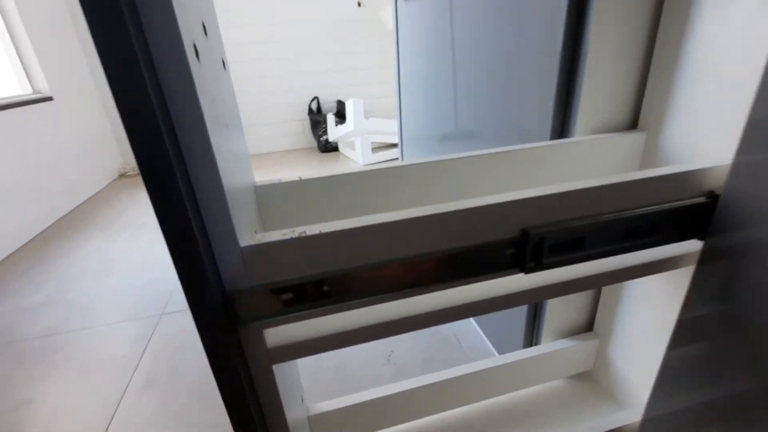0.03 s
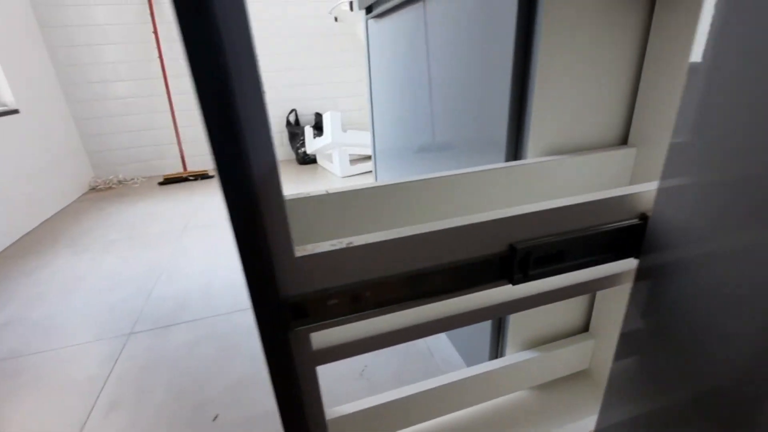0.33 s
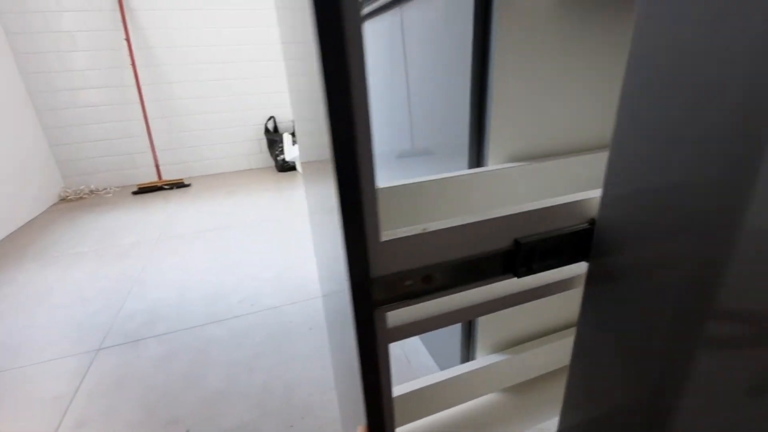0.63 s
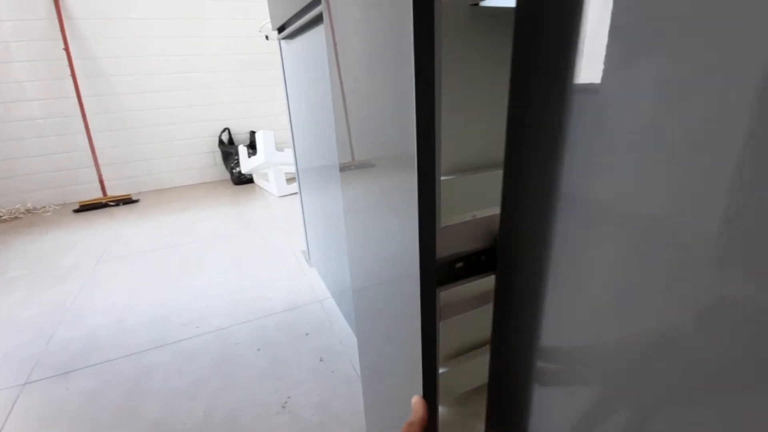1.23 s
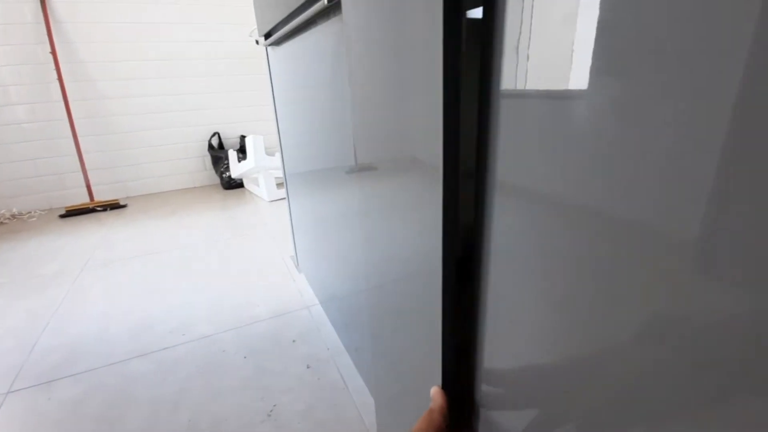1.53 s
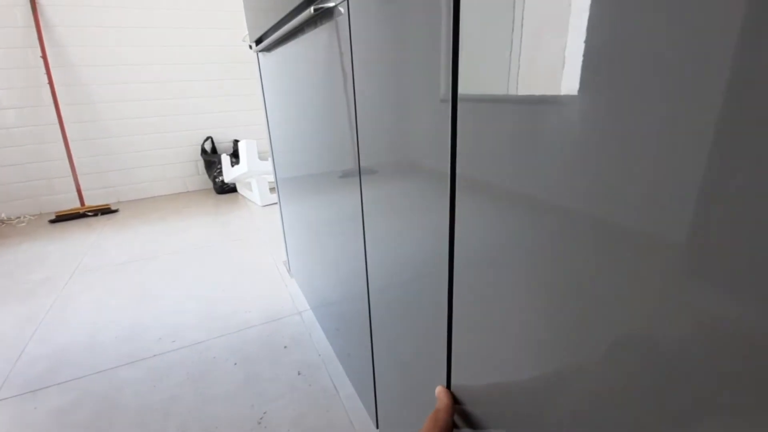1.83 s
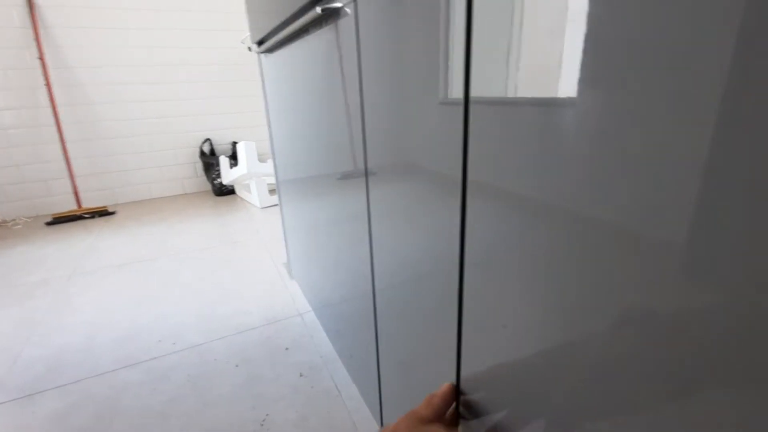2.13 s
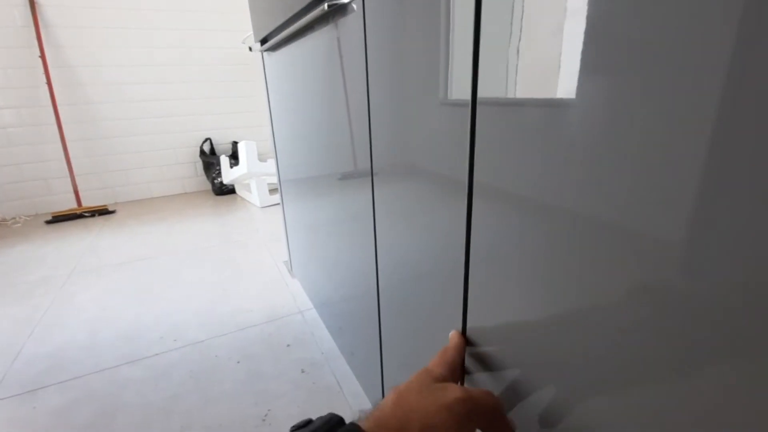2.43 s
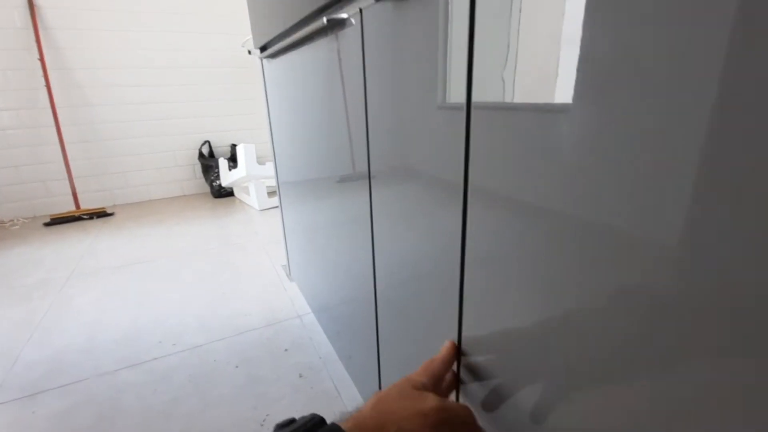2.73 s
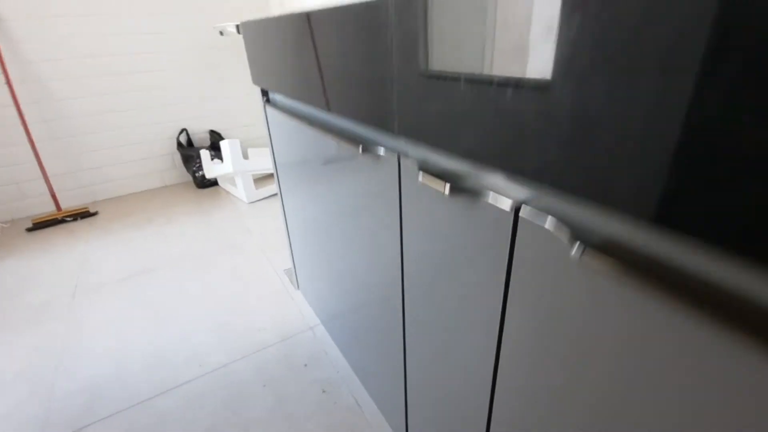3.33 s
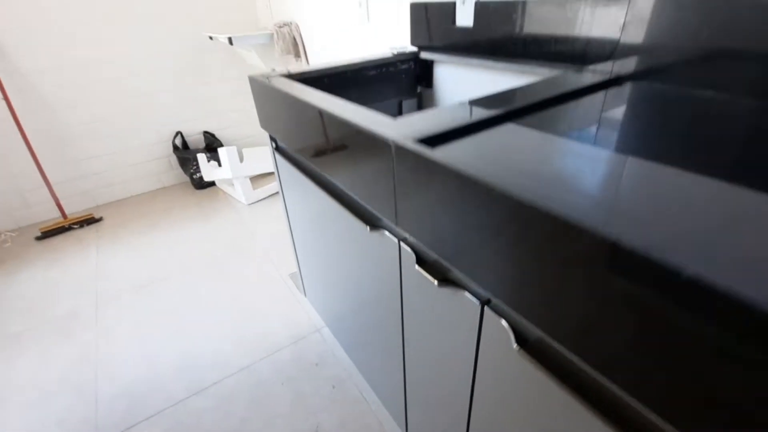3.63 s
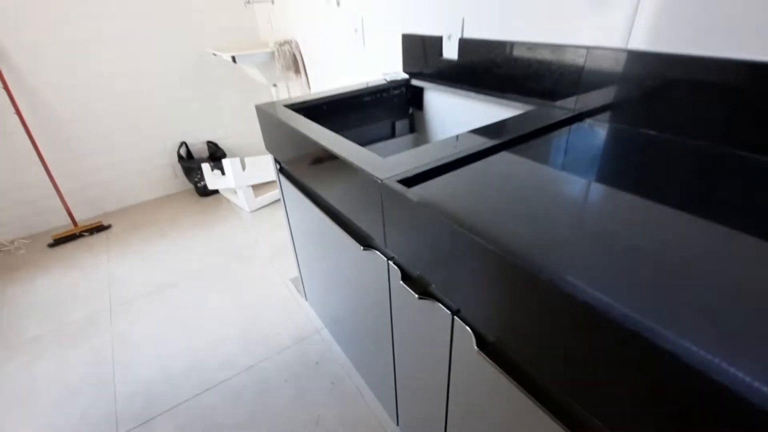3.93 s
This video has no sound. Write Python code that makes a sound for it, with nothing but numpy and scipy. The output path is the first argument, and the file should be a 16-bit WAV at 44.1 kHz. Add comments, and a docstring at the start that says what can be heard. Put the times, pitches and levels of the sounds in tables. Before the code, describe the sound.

A drawer rolls shut with soft knocks, followed by a sharp click in a bare room.

```python
"""Drawer closing in a bare room

A cabinet drawer is pushed shut on ball-bearing slides in an unfinished room. The bearings drone at
a pitch set by the speed, rumble through the panels and hiss on the rail; the slide knocks on its way.
Then the hand-held stereo microphone is carried off: sleeve rustle, faint close ticks and one sharp
click over the low rumble of the room."""
import sys
import numpy as np
from scipy import signal
from scipy.fft import rfft, irfft, next_fast_len
from scipy.io import wavfile
from scipy.ndimage import map_coordinates

SR = 44100
rng = np.random.default_rng(int(sys.argv[2]) if len(sys.argv) > 2 else 0)


def put_to_file(sound):
    """Save the sound as 16-bit audio at rate SR, in the file named by the first command-line argument."""
    columns = np.atleast_2d(sound).T  # one column per channel
    safe = np.clip(columns, -1, 1)
    whole_steps = np.round(safe * 32767)
    wavfile.write(sys.argv[1], SR, whole_steps.astype(np.int16))


N = 176400

# narrow low resonances of the cabinet and the room (frequency [Hz], boost [dB])
HOLLOW = [(161, 1.5), (209, 6), (237, 7), (286, 0), (307, 3), (360, 3.5), (437, 8), (474, 4.5), (566, 9.5),
          (630, 9.5), (771, 8), (906, 14)]
HOLLOW_WIDTH_HZ = 4.9


def amp(db):
    """Decibels to gain."""
    return 10 ** (np.asarray(db) / 20)


def unit(x):
    """Scale to rms 1."""
    return x / np.sqrt(np.mean(x ** 2) + 1e-20)


def along(points, hz):
    """Read (frequency [Hz], value) points on a log axis."""
    freqs, values = np.transpose(points)
    return np.interp(np.log(hz + 1), np.log(freqs + 1), values)


def curve(rows):
    """(time [s], value) points to one value per sample."""
    return np.interp(np.arange(N) / SR, *np.transpose(rows))


def wobble(rate):
    """A smooth random curve, rate knots a second."""
    return map_coordinates(rng.standard_normal(4096), [np.arange(N) * rate / SR], mode="wrap")


def swell(start, length, rise):
    """A rounded stroke that peaks after the share rise of its length."""
    progress = (np.arange(N) / SR - start) / length
    return np.sin(np.pi / 2 * np.interp(progress, [0, rise, 1], [0, 1, 0]))


def add(out, s, sound):
    """Mix a sound in at time s."""
    part = out[:, round(s * SR):][:, :sound.shape[-1]]
    part += sound[..., :part.shape[1]]


def filtered(x, response):
    """Filter x by a gain that depends on frequency."""
    size = next_fast_len(N + SR // 2)
    return irfft(rfft(x, size) * response(np.fft.rfftfreq(size, 1 / SR)), size)[..., :N]


def resonate(x, peaks, width_hz):
    """Lift narrow resonances (frequency [Hz], boost [dB]) out of a sound; rms 1."""
    boost_db = lambda f: sum(db / (1 + ((f - hz) / width_hz) ** 2) for hz, db in peaks)
    return unit(filtered(x, lambda f: amp(boost_db(f))))


def spread(pair, spectrum):
    """Colour two unrelated signals into a stereo field of rms 1, near mono in the bass."""
    # how alike the two microphones hear the room (frequency [Hz], correlation [0-1])
    likeness = [(60, 0.93), (250, 0.97), (500, 0.68), (900, 0)]
    angle = lambda hz: np.arccos(along(likeness, hz)) / 2
    response = lambda hz: amp(along(spectrum, hz)) * [np.cos(angle(hz)), np.sin(angle(hz))]
    mid, side = filtered(pair, response)
    return unit(np.array([mid + side, mid - side]))


def noise(spectrum):
    """Coloured stereo noise."""
    return spread(rng.standard_normal((2, N)), spectrum)


def grit(per_s, share):
    """Tiny random contacts on top of smooth friction noise."""
    contacts = (rng.random((2, N)) < per_s / SR) * rng.standard_normal((2, N))
    return np.sqrt(share) * unit(contacts) + np.sqrt(1 - share) * rng.standard_normal((2, N))


def contact(spectrum, crack_s, room_db, early_db, early_s):
    """A short crack, its reflections from nearby panels and the room's tail."""
    # reverberation of the bare room (frequency [Hz], t60 [s])
    room_decay = [(200, 1), (2000, 0.31), (6000, 0.31), (14000, 0.2)]
    t = np.arange(SR // 2) / SR
    burst = lambda env: rng.standard_normal((2, len(t))) * env / np.linalg.norm(env)
    hz, when, bands = signal.stft(rng.standard_normal((2, len(t))), SR, nperseg=256)
    bands *= amp(-60 * when / along(room_decay, hz)[:, None])
    tail = signal.istft(bands, SR, nperseg=256)[1][:, :len(t)]
    tail *= 1 - np.exp(-t / 0.004)  # the room takes a moment to answer
    crack = burst(amp(-60 * t / crack_s))
    early = amp(early_db) * burst(amp(-60 * t / early_s))
    hit = crack + early + amp(room_db) * tail / np.linalg.norm(tail[0])
    # a minimum-phase filter keeps the attack sharp
    cepstrum = irfft(np.log(amp(along(spectrum, np.fft.rfftfreq(2048, 1 / SR)))))
    fold = np.r_[1, np.full(1023, 2), np.zeros(1024)]
    colour = irfft(np.exp(rfft(cepstrum * fold)))
    return signal.fftconvolve(hit, colour[None] / np.linalg.norm(colour), axes=1)


def ring(modes, attack_s, scatter=0.006):
    """Struck modes, tuned a little differently at every blow."""
    t = np.arange(SR // 2) / SR
    tones = sum(amp(db - 60 * t / t60) * np.sin(2 * np.pi * hz * (1 + scatter * rng.normal()) * t)
                for hz, db, t60 in modes)
    return tones * (1 - np.exp(-t / attack_s))


def bearing_drone():
    """The turning bearings shake the drawer unevenly, at a pitch that follows its speed."""
    # bearing pitch (time [s], frequency [Hz])
    pitch = [(0, 55.5), (.28, 56.76), (.48, 60.15), (.7, 64), (.9, 68.1), (1.12, 70.6), (1.3, 66.3),
             (1.5, 62.6), (1.85, 56.5)]
    # drone along the travel (time [s], level [dB])
    level = [(0, -52.5), (.18, -33.5), (.3, -34), (.43, -35.5), (.55, -43), (.76, -34), (.88, -30),
             (1.05, -39), (1.2, -45), (1.42, -36.5), (1.58, -59), (1.76, -42), (1.92, -61)]
    # first three harmonics (relative level [dB])
    harmonics = [1.5, -6.5, -20]
    phase = 2 * np.pi * np.cumsum(curve(pitch) * (1 + 0.025 * wobble(25.14))) / SR
    tone = sum(amp(db + 1.36 * k * wobble(12.5)) * np.sin(k * phase)
               for k, db in enumerate(harmonics, 1))
    return amp(curve(level) + 1.9 * wobble(32.3)) * unit(tone)


def slide_roll(contacts_per_s=900, grit_share=0.18, low_cut_hz=79.5):
    """Rolling contacts rumble in the panels and hiss on the steel rail."""
    # rumble of the panels (time [s], level [dB])
    panel_level = [(0, -44), (.18, -38.5), (.6, -38), (.71, -32.5), (.83, -32.5), (.95, -34), (1.2, -37.5),
                   (1.32, -35), (1.58, -36.5), (1.66, -38.5), (1.77, -38), (1.88, -54), (2.15, -47),
                   (2.3, -50)]
    # panel spectrum (frequency [Hz], gain [dB])
    panel_colour = [(47, -35), (80, 0), (110, -4.5), (168, -3.5), (228, -15.5), (280, -0.5), (350, -10.5),
                    (440, -16), (650, -22.5), (800, -46), (2000, -90)]
    # hiss of the rail (time [s], level [dB])
    rail_level = [(0, -51), (.3, -48), (.62, -46), (.85, -44.5), (1.25, -46), (1.62, -48), (1.9, -53),
                  (2.17, -52.5), (2.35, -54.5)]
    # rail spectrum (frequency [Hz], gain [dB])
    rail_colour = [(410, -13.5), (700, 0.5), (931, 0), (1360, -4), (2050, -5), (2530, -7.5), (2950, -10),
                   (5640, -16), (8210, -21), (10100, -31.5), (12300, -27.5), (15500, -55)]
    body = spread(grit(contacts_per_s, grit_share), panel_colour)
    body = filtered(body, lambda hz: 1 - 1 / (1 + (hz / low_cut_hz) ** 8))
    body = resonate(body, HOLLOW, HOLLOW_WIDTH_HZ)
    rail = spread(grit(contacts_per_s, grit_share), rail_colour)
    rail = resonate(rail, [(1490, 3.6), (2130, 3), (2490, 3.7)], width_hz=22)
    return amp(curve(panel_level)) * body + amp(curve(rail_level) + 0.53 * wobble(39.75)) * rail


def room_tone(hiss_db=-58.5, whine_hz=2498, waver_hz=7):
    """A hollow fluttering rumble, faint hiss and a thin whine lie under everything."""
    # low rumble (time [s], level [dB])
    rumble_level = [(0, -50.5), (1.8, -43), (2.12, -41), (2.3, -44.5), (2.55, -42.5), (2.68, -39.5),
                    (2.79, -42.5), (2.97, -38.5), (3.15, -43.5), (3.3, -43), (3.7, -48.5), (4, -45.5)]
    # rumble spectrum (frequency [Hz], gain [dB])
    rumble_colour = [(25, -56), (38, -28), (54, -16), (100, -16), (150, -16), (185, -14.5), (250, -4),
                     (305, -1), (400, -11.5), (520, -13), (700, -29.5), (900, -29.5), (1900, -95)]
    # hiss spectrum (frequency [Hz], gain [dB])
    hiss_colour = [(410, -4.5), (800, -4), (1050, -17), (1800, -26.5), (2460, -18), (3200, -15),
                   (6000, -14.5), (10000, -29), (13500, -22), (15500, -23)]
    # whine, weaker once the microphone has moved (time [s], level [dB])
    whine_level = [(0, -74), (1.4, -69), (1.9, -70), (3, -70), (3.3, -75)]
    rumble_gain = amp(curve(rumble_level) + 0.7 * wobble(14))
    rumble = resonate(noise(rumble_colour), HOLLOW, HOLLOW_WIDTH_HZ)
    whine = unit(np.sin(2 * np.pi * np.cumsum(whine_hz + waver_hz * wobble(40)) / SR))
    hiss = amp(hiss_db) * noise(hiss_colour)
    whine_gain = amp(curve(whine_level) + 2.1 * np.array([wobble(7.4), wobble(8.1)]))
    return rumble_gain * rumble + hiss + whine_gain * whine


def handling_noise():
    """Right at the microphone, a sleeve rustles, fingers brush and scrape, and the grip bumps."""
    # sleeve rustle (time [s], level [dB])
    sleeve_level = [(2.1, -72), (2.45, -63.5), (2.58, -52.5), (2.7, -74), (2.88, -61.5), (2.97, -50),
                    (3.12, -50), (3.3, -54.5), (3.5, -56.5), (3.72, -52), (3.83, -56), (3.91, -53.5),
                    (3.96, -44), (4, -47)]
    # cloth spectrum (frequency [Hz], gain [dB])
    sleeve_colour = [(400, 6.5), (900, -6.5), (2100, -2.5), (3000, -3), (6500, -0.5), (9500, -7.5),
                     (13000, -4.5)]
    # fingers brushing the housing (start [s], length [s], level [dB])
    brushes = [(-.2, 0.59, -64.5), (.2, 0.3, -58), (.4, 0.57, -61.5), (3.41, 0.27, -52)]
    # brush spectrum (frequency [Hz], gain [dB])
    brush_colour = [(4000, -12), (8000, -4.5), (11000, -4.5), (13500, -0.5), (16000, -4)]
    # soft scrapes as a hand shifts (start [s], length [s], level [dB])
    scrapes = [(2.04, 0.22, -58), (3.91, 0.12, -52)]
    # scrape spectrum (frequency [Hz], gain [dB])
    scrape_colour = [(300, -18), (900, 3), (1250, -3), (2100, 0), (3000, -13), (8000, -28)]
    # low bumps of the grip (start [s], length [s], level [dB], left minus right [dB])
    bumps = [(1.701, 0.095, -47, -0.5), (1.929, 0.45, -50, -0.5), (2.302, .28, -49, -0.5),
             (2.586, 0.12, -43, 0.5), (2.88, 0.34, -51.5, 2), (3.209, 0.12, -44, 8), (3.309, 0.098, -43, 5)]
    # bump spectrum (frequency [Hz], gain [dB])
    bump_colour = [(30, -47), (46, 17), (60, 17.5), (85, 11.5), (135, 11), (250, -22), (700, -100)]
    sleeve_gain = amp(curve(sleeve_level) + 0.41 * wobble(25.88))
    brush_gain = sum(amp(db) * swell(s, length, rise=0.25) for s, length, db in brushes)
    scrape_gain = sum(amp(db) * swell(s, length, rise=0.15) for s, length, db in scrapes)
    bump_gain = sum(amp([[db + pan / 2], [db - pan / 2]]) * swell(s, length, rise=0.42)
                    for s, length, db, pan in bumps)
    return (sleeve_gain * spread(grit(per_s=1500, share=0.12), sleeve_colour)
            + brush_gain * noise(brush_colour)
            + scrape_gain * noise(scrape_colour)
            + bump_gain * noise(bump_colour))


def panel_boom(pitch_hz=166, waver_hz=5.8):
    """A panel booms on one low resonance during parts of the travel."""
    # swells of the panel (start [s], length [s], level [dB])
    booms = [(.53, 0.094, -36.5), (0.674, 0.093, -32), (1.367, .26, -35.5)]
    tone = np.sin(2 * np.pi * np.cumsum(pitch_hz + waver_hz * wobble(34.95)) / SR)
    envelope = sum(amp(db) * swell(s, length, rise=0.65) for s, length, db in booms)
    return tone * amp(1.7 * wobble(30.4)) * envelope


def drawer_knocks():
    """The slide catches and the front is pressed home: a ringing steel clack and a panel thud."""
    # knocks (time [s], relative steel level [dB], relative thud level [dB])
    blows = [(0.7214, -12, 1), (.727, -19, 8.5), (1.283, -25, 8.5), (1.727, -20, -2.5), (2.598, -27, -3.5)]
    # clack spectrum (frequency [Hz], gain [dB])
    steel_colour = [(300, -21.5), (650, 7), (1000, -2.5), (1550, -3.5), (2600, -4.5), (4200, -14),
                    (16000, -44)]
    # modes of the steel slide (frequency [Hz], level [dB], t60 [s])
    steel_modes = [(1400, -1.5, 0.031), (1563, 0, 0.026), (2677, -8.5, 0.04), (4100, -12, 0.027)]
    # modes of the panels (frequency [Hz], level [dB], t60 [s])
    panel_modes = [(86.8, -8.5, 0.2), (133, -14.5, 0.13), (162, -7.5, 0.42), (291, -6, 0.21),
                   (448, -17, 0.27)]
    out = np.zeros((2, N))
    for s, steel_db, thud_db in blows:
        clack = contact(steel_colour, crack_s=0.054, room_db=1, early_db=-3.5, early_s=0.2)
        add(out, s, amp(steel_db) * clack)
        add(out, s, amp(steel_db - 18.5) * ring(steel_modes, attack_s=0.0018))
        add(out, s, amp(thud_db - 30) * ring(panel_modes, attack_s=0.0067))
    return out


def close_ticks():
    """Faint handling ticks sound close to the microphone and fairly dry."""
    # ticks (time [s], level [dB], centre [Hz])
    ticks = [(2.139, -31, 4560), (2.171, -29, 4800), (2.793, -28, 5940), (2.804, -31, 6280),
             (3.164, -23.5, 8200), (3.871, -28, 8130)]
    out = np.zeros((2, N))
    for s, db, hz in ticks:
        colour = [(hz / 4, -10), (hz, 0), (hz * 4, -33)]
        add(out, s, amp(db) * contact(colour, crack_s=0.015, room_db=-2, early_db=-5, early_s=0.054))
    return out


def sharp_click():
    """One sharp click rings briefly and wakes the room."""
    # the click's two contacts (time [s], level [dB])
    hits = [(3.0674, -14.5), (3.0701, -24)]
    # click spectrum (frequency [Hz], gain [dB])
    colour = [(500, -38.5), (1150, -13), (1750, -0.5), (2050, 1), (2600, 1.5), (3200, -9), (3850, -3),
              (4800, -10.5), (7000, -7.5), (8700, -13), (9700, -22), (16000, -24)]
    # its brief ring (frequency [Hz], level [dB], t60 [s])
    modes = [(2060, -4, 0.018), (2400, 4.5, 0.014), (3880, -12, 0.011)]
    out = np.zeros((2, N))
    for s, db in hits:
        add(out, s, amp(db) * contact(colour, crack_s=0.0075, room_db=3.5, early_db=-2, early_s=0.16))
        add(out, s, amp(db - 17) * ring(modes, attack_s=0.00046))
    return out


def scene():
    """The drawer, the handling and the room as they reach the microphone."""
    drawer = bearing_drone() + slide_roll() + panel_boom() + drawer_knocks()
    return drawer + sharp_click() + close_ticks() + handling_noise() + room_tone()


def record(dry):
    """The microphone's two sides differ in colour and keep nothing above the band limit."""
    # channel balance (frequency [Hz], left minus right [dB])
    balance = [(60, 0), (130, 2.4), (260, -0.1), (600, 1.1), (1300, 1.5), (2300, 0), (4000, -1), (6000, -7),
               (8000, -1), (12000, -0.5)]
    top_hz = 15750
    sides = np.array([[.5], [-.5]])
    return filtered(dry, lambda hz: amp(along(balance, hz) * sides) * (hz < top_hz))


dry = scene()
out = record(dry)
put_to_file(out)
```